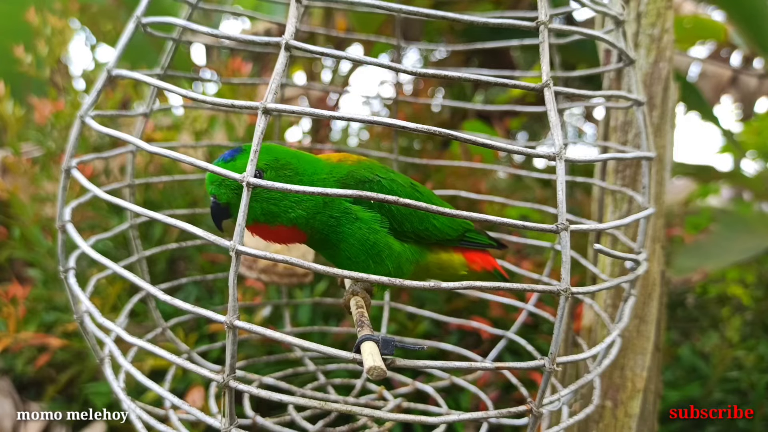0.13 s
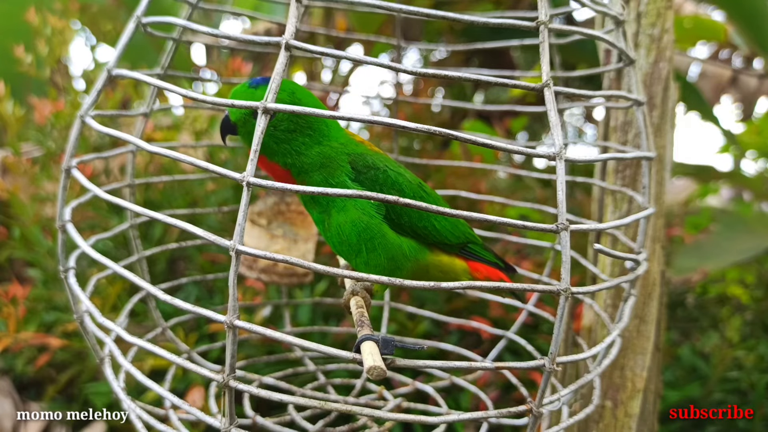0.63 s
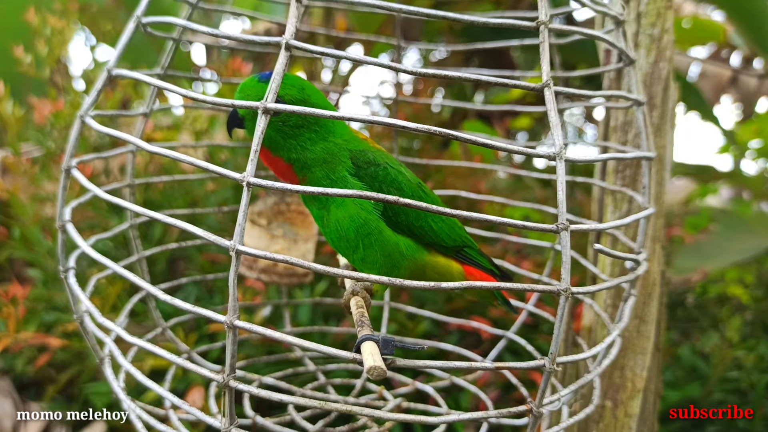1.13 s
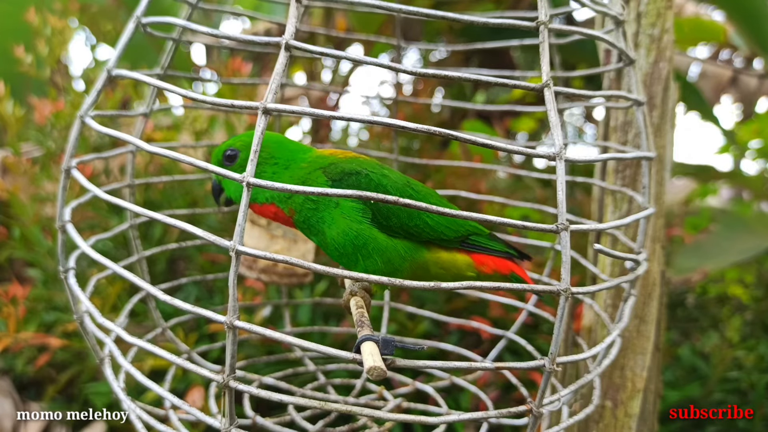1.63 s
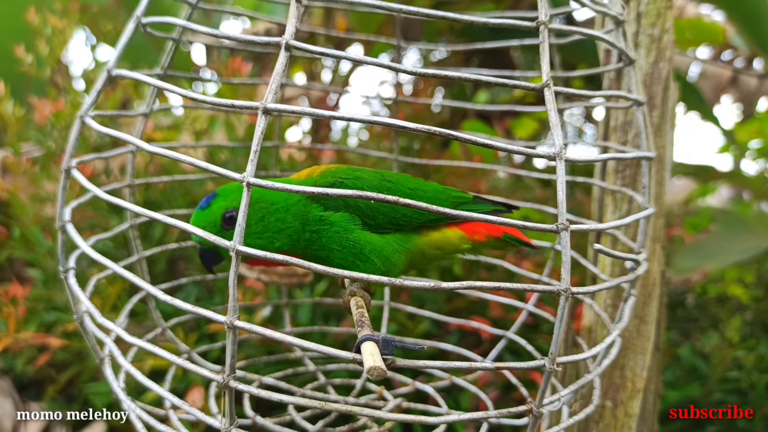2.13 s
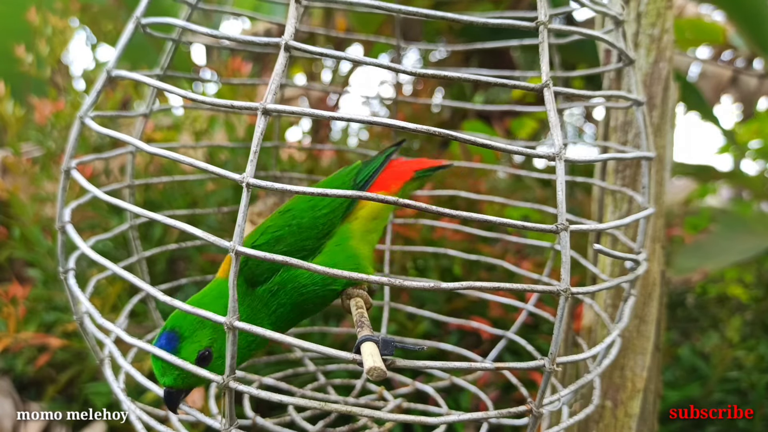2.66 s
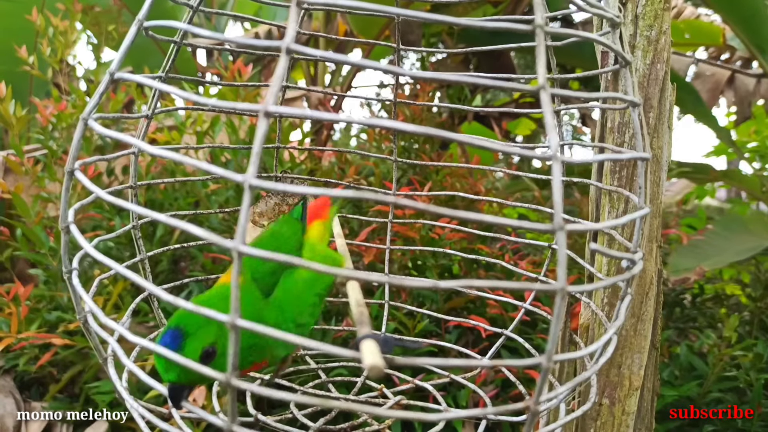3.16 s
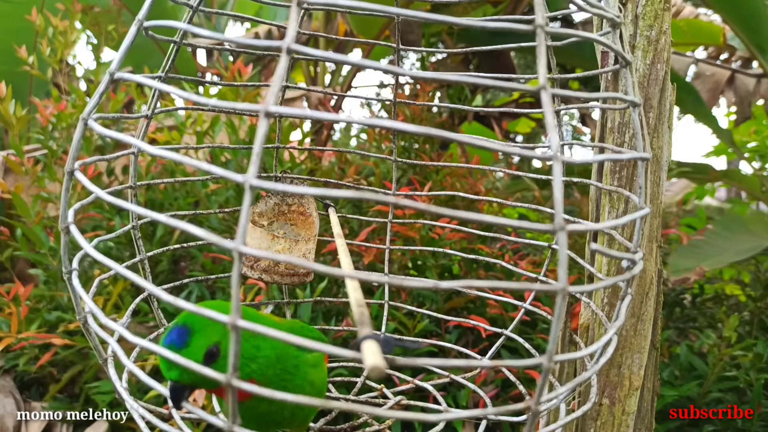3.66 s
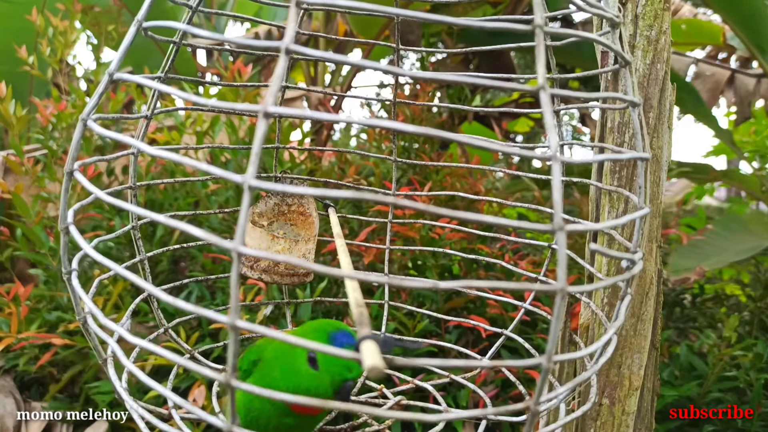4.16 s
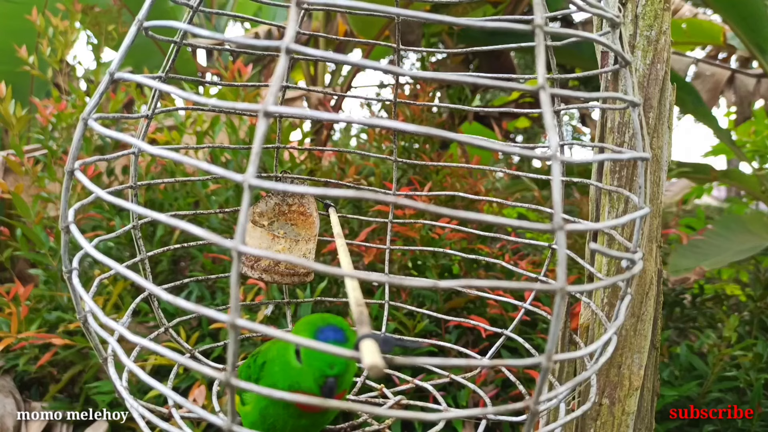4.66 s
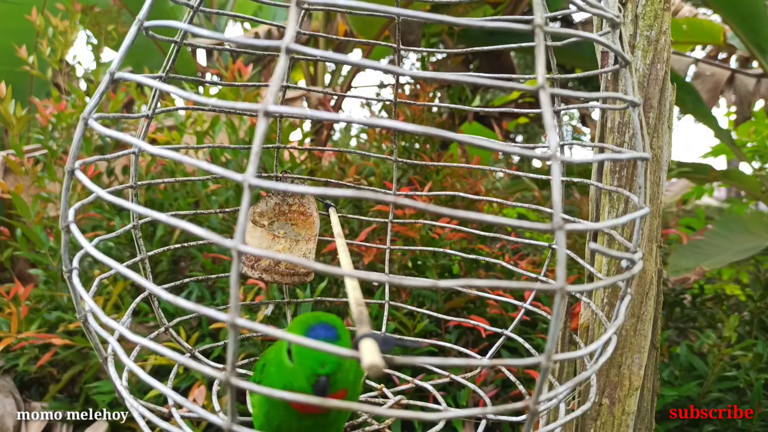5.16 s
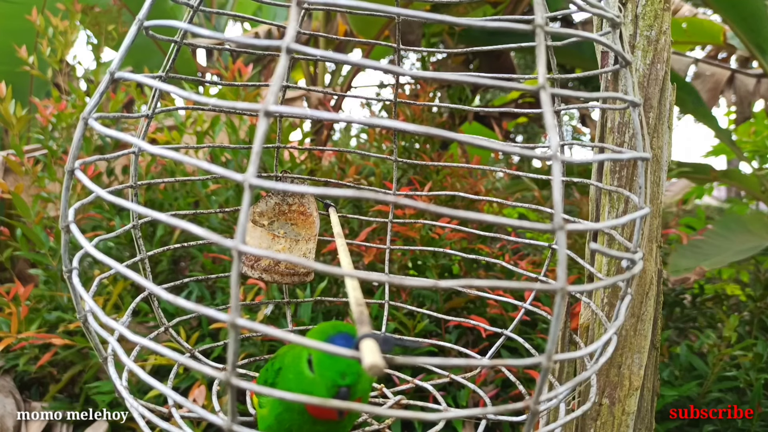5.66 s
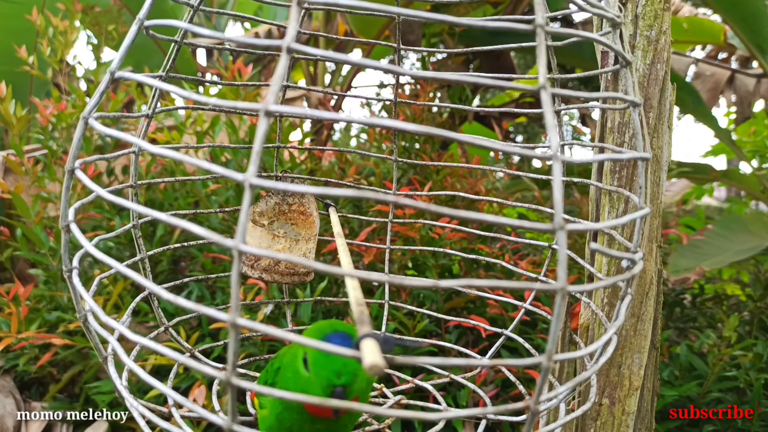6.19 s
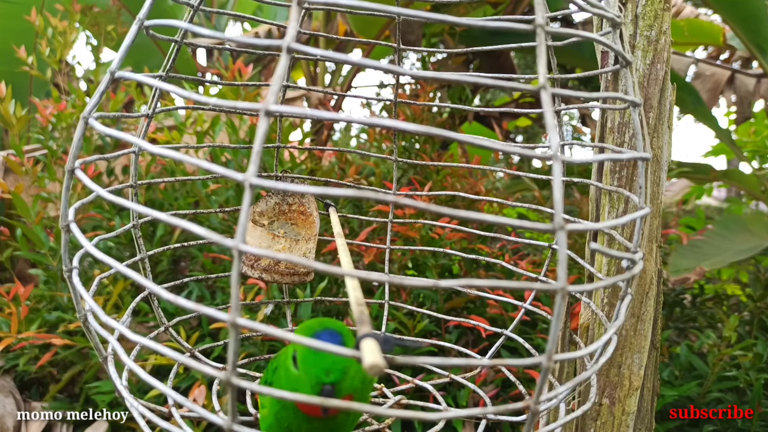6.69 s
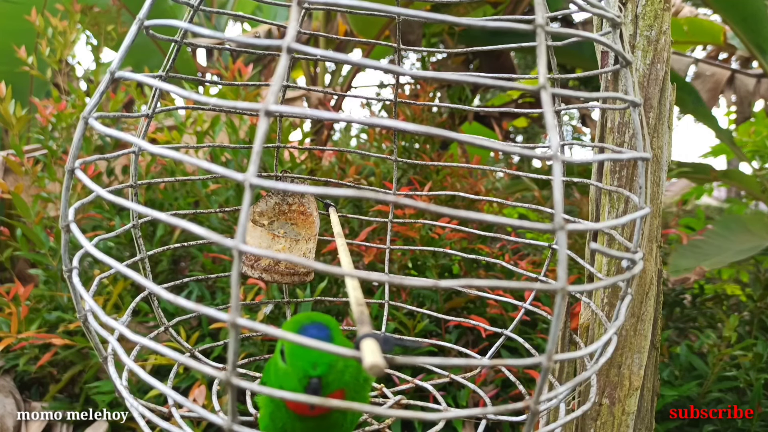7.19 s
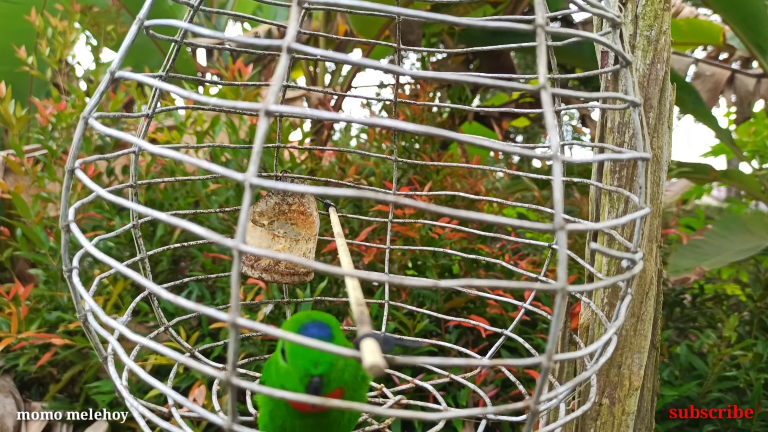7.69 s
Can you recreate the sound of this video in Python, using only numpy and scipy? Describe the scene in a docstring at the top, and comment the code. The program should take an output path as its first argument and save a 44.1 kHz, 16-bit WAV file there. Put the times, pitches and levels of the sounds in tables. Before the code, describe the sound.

A quiet garden heard by a phone microphone near a small parrot. Faint low traffic rumble, soft leaf hiss and a thin, flickering insect-like shrilling around 7 kHz run throughout. A far parrot trill fades at the start; others come as blurred echoes near 0.3, 1.4, 3.2 and 5.7 s. At 1.7-2.1 s the near parrot gives a piercing trill of about eight rapid whistled syllables, each breaking downward, ending in a lower slide. At 2.35-2.45 s comes a quick warbling chirp, rising then falling. A faint distant horn sounds at 2.5-2.8 s. Soft dove coos appear around 1.3-2.2 s and 4.2-6.1 s, with tiny far bird whistles clustering at 4.2-5.1 s. Slight rustles pass, one near 6.3 s. At 7.3-7.8 s the parrot trills again, louder, clearer and longer, with light garden echo.

```python
"""Caged parrot in a garden

A small parrot, close to a phone microphone, gives a shrill trill, a chirp and another trill: gliding
whistles with an octave, a rasp and a broad hiss that rises and falls with the calls. Far parrots trill
as echoes over a thin shrilling of noise. A dove's arching tones, small birds' glides and a far horn's
steady tones come with garden echo. Shaped noise makes traffic rumble, leaf hiss, rustles and insects."""
import sys
import numpy as np
from scipy import signal
from scipy.fft import rfft, irfft, next_fast_len
from scipy.io import wavfile
from scipy.ndimage import uniform_filter1d, map_coordinates

SR = 44100
rng = np.random.default_rng(int(sys.argv[2]) if len(sys.argv) > 2 else 0)


def dump(signal):
    """Clip the signal to [-1, 1] and save it as 16-bit WAV at the path in sys.argv[1]."""
    limited = np.clip(np.atleast_2d(signal).T, -1, 1)
    pcm = np.round(limited * 32767).astype(np.int16)
    wavfile.write(sys.argv[1], SR, pcm)


def level_to_linear(level):
    """Convert decibel levels to linear amplitude factors, elementwise."""
    exponent = np.asarray(level, float) / 20
    return 10 ** exponent


N = 344862
T = np.arange(N) / SR  # seconds


def unit(x):
    """Scaled to rms 1."""
    return x / np.sqrt(np.mean(x ** 2) + 1e-20)


def curves(rows):
    """One value per sample for each column after the time."""
    s, *columns = np.transpose(sorted(rows))
    return [np.interp(T, s, column) for column in columns]


def wobble(rate):
    """A smooth random curve, rate knots a second."""
    knots = rng.standard_normal(int(N * rate / SR) + 4)
    return map_coordinates(knots, [T * rate])


def noise():
    """White noise as long as the scene."""
    return rng.standard_normal(N)


def coloured(x, points):
    """x filtered through (Hz, dB) points read on a log frequency axis."""
    m = next_fast_len(N + 8192)
    hz, db = np.transpose(points)
    log_hz = np.log(np.fft.rfftfreq(m, 1 / SR) + 1)
    gain = level_to_linear(np.interp(log_hz, np.log(hz), db))
    return irfft(rfft(x, m) * gain, m)[:N]


def tone(hz):
    """Phase of a gliding pitch, in radians."""
    return 2 * np.pi * np.cumsum(hz) / SR


def narrow(hz, rate):
    """A narrow band of noise, rms 1: a tone in quadrature, each part moved by rate random knots a second."""
    phase = tone(hz + 0 * T)
    return unit(wobble(rate) * np.sin(phase) + wobble(rate) * np.cos(phase))


def echo(x, t60, delay):
    """A dense noise tail of unit energy, falling 60 dB in t60 s, silent until delay s."""
    t = np.arange(SR) / SR
    tail = rng.standard_normal(SR) * level_to_linear(-60 * t / t60) * (t > delay)
    return signal.fftconvolve(x, tail / np.linalg.norm(tail))[:N]


# the two near trills, levels ahead of the microphone port:
# opening_s, first_syllable_s, closing_note_s, pitch_hz, level_db, share of pitch lost by the close
NEAR_TRILLS = [(1.688, 1.72, 2.028, 6712, -19.5, .008), (7.3235, 7.353, 7.738, 6624, -12, .02)]
# how each trill opens and ends: opening accent_db, closing note length_s, tail length_s, tail_db
TRILL_ENDS = [(3, .028, 0.026, 3), (-9.5, .031, 0.018, -11)]
# syllables in each trill: total count, count of last ones that break deep
SYLLABLE_COUNTS = [(8, 2), (10, 3)]
# the near chirp, ahead of the microphone port: time_s, pitch_hz, level_db, warble_depth_hz
CHIRP_PATH = [(2.343, 6230, -61, 5), (2.349, 6040, -31.5, 0), (2.356, 6270, -34.5, 100),
              (2.360, 6630, -19, 552), (2.378, 7020, -26, 495), (2.390, 7360, -20, 102),
              (2.398, 7300, -25, -3.5), (2.416, 6680, -23, 4), (2.427, 6410, -20.5, 5),
              (2.443, 5937, -31, 1), (2.448, 6000, -60, 1.5)]
WARBLE_HZ, WARBLE_START_S = 185, 2.3612
# how the bird faces in each call: shadow_db at the held pitch, octave_db, half_pitch_db, call_hiss_db,
# rasp_db, near_echo_db, far_echo_db
BIRD_FACING = [(-15, -14, -34, -27, -29.5, -8.5, -18.5), (-6, -18, -60, -34.5, -30, -12.5, -28),
               (1, -15.5, -67.5, -34.5, -37, -13, -30)]
# colour of the broad hiss that follows the calls: frequency_hz, gain_db
CALL_HISS_COLOUR = [(2500, -20), (5000, -5.5), (6500, -1), (16000, -10.5)]
# the microphone port's response: frequency_hz, gain_db
MIC_PORT = [(2000, -11.5), (4000, -12), (5000, -21), (5800, -3), (6500, 0), (7500, 3), (8300, 1.5),
            (9000, -14.5), (11000, -19), (11800, 2), (13500, -8), (15000, -0.5), (15500, -40.5)]


def parrot():
    """Whistle, octave, half pitch, rasp and broad hiss of each call, with the echoes of cage and garden."""
    out = np.zeros(N)
    trills = zip(NEAR_TRILLS, TRILL_ENDS, SYLLABLE_COUNTS)
    first, last = (trill(row, ends, count) for row, ends, count in trills)
    for notes, facing in zip((first, CHIRP_PATH, last), BIRD_FACING):
        shadow_db, octave_db, half_db, call_hiss_db, rasp_db, near_db, far_db = facing
        hz, db, depth_hz = curves(notes)
        warble_hz = depth_hz * np.sin(2 * np.pi * WARBLE_HZ * (T - WARBLE_START_S))
        during = (T > notes[0][0]) * (T < notes[-1][0])
        # the warble is loud at its top and faint at its bottom
        level = level_to_linear(db + .011 * warble_hz + .4 * wobble(250)) * during
        phase = tone(hz + warble_hz + 25 * wobble(400))
        whistle = level * np.sqrt(2) * np.sin(phase)
        # turned away, a close reflection cancels the held pitch but not the glides
        held = np.exp(-((hz - 6710) / 130) ** 2)
        direct = whistle * level_to_linear(shadow_db * held)
        octave = level * level_to_linear(octave_db) * np.sqrt(2) * np.sin(2 * phase)
        half = level * level_to_linear(half_db + 7.2 * wobble(50)) * np.sin(phase / 2) * (hz > 6400)
        call_hiss = level_to_linear(call_hiss_db + 7.0 * wobble(240)) * unit(coloured(noise(), CALL_HISS_COLOUR))
        throat = level_to_linear(rasp_db) * rasp(notes[1][0] + 0.0012, hz)
        near = echo(whistle + level_to_linear(-1) * octave, t60=.12, delay=.003)
        far = echo(whistle + octave, t60=0.49, delay=0.033)
        far = coloured(far, [(4000, -12), (6000, -0.5)])
        out += direct + octave + half + level * (call_hiss + throat)
        out += level_to_linear(near_db) * near + level_to_linear(far_db) * far
    return coloured(out, MIC_PORT)


# the double flick before the first syllable: time_s from it, pitch factor, level_db
FLICK_PATH = [(-.019, 1, 0.5), (-.015, 1.05, -4.5), (-.012, 1.13, -2.5), (-.01, .99, -2),
              (-.008, .87, -8.5), (-.0055, 1.09, -2), (-.0035, .93, -7)]
# the closing note around its end: time_s from it, pitch factor, level_db
CLOSE_DROP = [(-.007, .99, -5), (0, 1.01, -1.5), (.003, .86, -13)]
# the low slide after the closing note: share of tail length, pitch factor, level_db
TAIL_SLIDE = [(0, 0.689, 2.5), (.35, .63, -6), (.75, 0.575, -4.5), (1, .58, -14), (1.15, 0.5, -39)]
# share by which the pace drags; closing pitch over that of the tired syllables
SLOWING, CLOSE_SHARE = .045, .98
HOLD_S, MEAN_SAG_DB = .0262, 3
# bottom of the first break, lowering per syllable, bottom of the deep breaks
SHALLOW_HZ, DEEPER_HZ, DEEP_HZ = 5593, 59, 4510


def trill(row, ends, count):
    """Opening note, flick, syllables that drag, tire and break deeper towards the end, closing note, tail."""
    opening, first, closing, hz, db, tire = row
    accent_db, close_s, tail_s, tail_db = ends
    total, deep = count
    rows = [(opening - .0025, 1.18 * hz, db - 46, 0),
            (opening + .001, 1.05 * hz, db + accent_db, 0),
            (opening + .004, hz, db - 3, 0)]
    rows += [(first + s, hz * k, db + d, 0) for s, k, d in FLICK_PATH]
    for i, (level_scatter, sag_scatter) in enumerate(rng.standard_normal((total, 2))):
        u = i / total
        start = first + (closing - first) * (u - SLOWING * u * (1 - u))
        bottom_hz = DEEP_HZ if total - i <= deep else SHALLOW_HZ - DEEPER_HZ * i
        rows += syllable(start, start + HOLD_S, hz * (1 - tire * u), bottom_hz,
                         db + .7 * level_scatter, MEAN_SAG_DB + 1.2 * sag_scatter)
    close_hz = hz * (1 - tire) * CLOSE_SHARE
    end = closing + close_s
    rows += [(closing + s, close_hz * k, db + d, 0) for s, k, d in ONSET_SHAPE]
    rows += [(end + s, close_hz * k, db + d, 0) for s, k, d in CLOSE_DROP]
    rows += [(end + 0.0067 + u * tail_s, close_hz * k, db + tail_db + d, 0) for u, k, d in TAIL_SLIDE]
    return sorted(rows)


# a syllable around its start, also the closing note's: time_s from it, pitch factor, level_db
ONSET_SHAPE = [(-.003, 1.16, -28), (-.0015, 1.09, -20), (0, 1.03, -9), (.002, 1.005, -1), (.005, 1, 0)]
# a syllable around its break: time_s from it, pitch factor, level_db
BREAK_SHAPE = [(-.005, 1.01, -.5), (-.001, 1.03, .5), (.001, 1.02, 0), (.0025, .96, -6)]


def syllable(start, stop, hz, bottom_hz, db, sag_db):
    """A held whistle whose level sags and lifts before its pitch breaks downward."""
    rows = [(start + s, hz * k, db + d, 0) for s, k, d in ONSET_SHAPE]
    rows += [(stop - .015, hz * .995, db - .8 * sag_db, 0), (stop - .008, hz, db - sag_db, 0)]
    rows += [(stop + s, hz * k, db + d, 0) for s, k, d in BREAK_SHAPE]
    bottom = stop + .0038 + 1.9e-6 * (hz - bottom_hz)  # deeper breaks last longer
    return rows + [(bottom, bottom_hz, db - 11, 0), (bottom + .0012, bottom_hz, db - 30, 0)]


# colour of the throat rasp: frequency_hz, gain_db
RASP_COLOUR = [(900, -25.5), (1700, -6.5), (2300, 0.5), (3000, -7.5), (5000, -0.5), (7000, -9.5),
               (16000, -25)]


def rasp(opening, hz):
    """Irregular 2 ms puffs of throat noise; strong ones as the call opens and before the pitch breaks."""
    puffs = (rng.random(N) < 150 / SR) * level_to_linear(3.5 * rng.standard_normal(N))  # about 150 a second
    breaks = np.flatnonzero(np.diff(1. * (hz < 6100)) > 0)
    puffs[breaks - round(.007 * SR)] = level_to_linear(6.5)
    puffs[round(opening * SR)] = level_to_linear(11.5)
    envelope = np.convolve(puffs, np.hanning(90), "same")
    return unit(coloured(envelope * noise(), RASP_COLOUR))


# far trills, each fading after its length: start_s, length_s, first_hz, last_hz, level_db
DISTANT_TRILLS = [(-.4, 0.38, 7000, 7000, -48.5), (.26, 0.11, 6710, 6490, -60.5),
                  (1.4, .45, 6920, 6790, -54), (3.2, 0.41, 6914, 6710, -50), (5.68, 0.5, 6800, 6800, -54)]
# thin shrilling: time_s, pitch_hz, level_db
SHRILL_PATH = [(0, 6950, -64.5), (.7, 6970, -80), (1.2, 6900, -66), (2.6, 6970, -73.5), (2.8, 7090, -65),
               (3.2, 7160, -64.5), (3.9, 6850, -80), (4.45, 6930, -72), (4.8, 6910, -76),
               (4.92, 7070, -66.5), (5.15, 7020, -73.5), (5.5, 7050, -68.5), (6.4, 7150, -64),
               (6.7, 7090, -70), (6.95, 7040, -76), (7.8, 7000, -71.5)]
# each far trill starts this far down, reaches full level, then dies away
SWELL_DB, SWELL_S, FADE_DB_PER_S = 4.5, .15, 109


def flock():
    """Far trills heard only as echoes, breaks blurred into a skirt below the pitch; thin noise shrilling."""
    path, level = [], 0
    for s, length, first_hz, last_hz, db in DISTANT_TRILLS:
        path += [(s, first_hz), (s + length, last_hz)]
        swell_db = SWELL_DB * np.clip(1 - (T - s) / SWELL_S, 0, 1)
        fade_db = FADE_DB_PER_S * np.clip(T - s - length, 0, None)
        level = level + (T > s) * level_to_linear(db - swell_db - fade_db)
    hz, = curves(path)
    pulse = np.sin(tone(26 + 3 * wobble(4.4)))
    breaks = np.clip(pulse - .75, 0, 1) * level_to_linear(2.3 * wobble(30))
    phase = tone(hz - 3000 * breaks + 110 * wobble(200))
    calls = level_to_linear(-80 * breaks) * (np.sin(phase) + level_to_linear(-34.5) * np.sin(2 * phase))
    blur = unit(echo(calls, t60=.3, delay=0))
    shrill_hz, shrill_db = curves(SHRILL_PATH)
    flicker_db = 2.1 * np.sin(tone(28 + 2.5 * wobble(2.7)))
    shrill = level_to_linear(shrill_db + flicker_db) * narrow(shrill_hz, 300)
    return uniform_filter1d(level, size=900) * blur + shrill


# coos, levels ahead of the echo mix: start_s, length_s, first_hz, reference pitch_hz, level_db
DOVE_COOS = [(1.328, 0.15, 650, 770, -58.5), (1.486, 0.17, 639, 749, -53.5), (2.049, .15, 658, 730, -51.5),
             (4.2, 0.11, 722, 742, -60.5), (4.5, 0.31, 561, 771.5, -55), (4.955, .24, 850, 804, -58),
             (5.149, .23, 730, 709, -53), (5.9, .19, 580, 740, -53)]
# a coo after its first pitch: share of length, factor on the reference pitch, level_db
COO_SHAPE = [(0.249, 0.96, -4), (.5, 0.99, -0.5), (.7, .93, -4.5), (1, .72, -10.5)]


def dove():
    """Soft rolling coos with strong echo: gliding tones, most arching up before they slide down."""
    out = np.zeros(N)
    for s, length, first_hz, pitch_hz, level_db in DOVE_COOS:
        path = [(s, first_hz, level_db - 10.5)]
        path += [(s + u * length, pitch_hz * k, level_db + d) for u, k, d in COO_SHAPE]
        hz, db = curves(path)
        during = (T > s) * (T < s + length)
        out += level_to_linear(db + 1.2 * wobble(40)) * np.sin(tone(hz + 40 * wobble(70))) * during
    return 0.9 * out + 0.82 * echo(out, t60=0.5, delay=.003)


# far whistles, levels ahead of the echo mix: start_s, length_s, first_hz, last_hz, level_db
FAR_WHISTLES = [(0.239, 0.087, 7200, 6000, -61.5), (1.048, 0.18, 3140, 3120, -82),
                (1.252, .093, 3407, 3280, -77), (1.29, 0.071, 6280, 6080, -69),
                (3.846, .3, 3330, 3100, -86), (4.17, 0.092, 5300, 5210, -71),
                (4.248, .081, 4900, 4150, -68.5), (4.39, 0.074, 1524, 1520, -74),
                (4.52, 0.071, 5160, 5030, -70.5), (4.575, 0.089, 5000, 4050, -66),
                (4.835, 0.038, 5940, 5800, -64), (4.85, .06, 5900, 5350, -65),
                (4.895, .073, 7200, 5900, -68), (5.055, 0.087, 6080, 5520, -71),
                (5.28, 0.087, 1178, 1160, -74.5), (5.516, 0.15, 1021, 979, -72),
                (7.201, .12, 1238, 1247, -72), (7.739, 0.07, 960, 950, -63.5)]
FLUTTER, GLIDE_FLUTTER = .014, 0.1  # pitch flutter as a share of the pitch and of the glide


def whistles():
    """Small far birds: gliding, fluttering notes, mostly echo from the garden."""
    out, flutter = np.zeros(N), wobble(120)
    for s, length, first_hz, last_hz, db in FAR_WHISTLES:
        glide_hz = last_hz - first_hz
        flutter_hz = FLUTTER * first_hz + GLIDE_FLUTTER * abs(glide_hz)
        at = slice(round(s * SR), min(N, round((s + length) * SR)))
        u = (T[at] - s) / length
        envelope = np.abs(np.sin(np.pi * u)) ** .5
        out[at] += level_to_linear(db) * envelope * np.sin(tone(first_hz + glide_hz * u + flutter_hz * flutter[at]))
    return 0.31 * out + 1.52 * echo(out, t60=0.73, delay=0.0026)


# the horn's steady tones: pitch_hz, relative level_db
HORN_TONES = [(1039, -88), (1389, -77), (1733, -77.5), (2073, -90)]


def horn():
    """A short far horn: steady tones that swell and stop together, with echo."""
    swell = np.interp(T, [2.5, 2.56, 2.76, 2.82], [0, 1, 1, 0])
    dry = swell * sum(level_to_linear(db + 5.5) * np.sin(2 * np.pi * hz * T) for hz, db in HORN_TONES)
    return 0.79 * dry + 0.51 * echo(dry, t60=0.41, delay=0.011)


# colour of the traffic rumble: frequency_hz, relative level_db per Hz
RUMBLE_COLOUR = [(15, -75), (25, -47), (38, -25.5), (82, -4.5), (146, -2), (224, -11.5), (824, -21),
                 (1010, -26), (1500, -31), (1950, -60.5), (3300, -120)]
# leaves and insects as the port colours them: frequency_hz, relative level_db per Hz
HISS_COLOUR = [(900, -42), (1500, 0.5), (3000, -4.5), (4700, -4), (5000, -12), (6000, -13), (6500, 2.5),
               (7600, 2.5), (8300, -5), (8700, -15.5), (11300, -24), (11800, -11.5), (15000, -8),
               (16000, -29.5)]
# brief rustles: centre_s, length_s, level_db
RUSTLE_BURSTS = [(1.282, 0.14, -74.5), (2.776, 0.0067, -63.5), (3.815, 0.018, -79), (4.4, .06, -77),
                 (6.332, 0.094, -66)]
# thin insect lines: pitch_hz, rate of random knots_per_s (sets the width), level_db
INSECT_LINES = [(7590, 110, -78.5), (8116, 120, -81.5)]


def garden():
    """Traffic rumble, leaf hiss with brief rustles, and thin insect lines, all of shaped noise."""
    rumble = level_to_linear(-60 + 0.83 * wobble(2.065)) * unit(coloured(noise(), RUMBLE_COLOUR))
    hiss = level_to_linear(-71.5 + 1.7 * wobble(3)) * unit(coloured(noise(), HISS_COLOUR))
    bursts = sum(level_to_linear(db) * np.exp(-((T - s) / length * 2) ** 2) for s, length, db in RUSTLE_BURSTS)
    rustle_colour = [(1200, -15), (2200, -1.0), (4500, -3), (6000, -4.5), (8300, 0.0), (9000, -23.5)]
    rustle = bursts * unit(coloured(noise(), rustle_colour))
    insects = sum(level_to_linear(db + 1.6 * wobble(2.5)) * narrow(hz, rate) for hz, rate, db in INSECT_LINES)
    return rumble + hiss + rustle + insects


def scene():
    """Everything at the one microphone."""
    mix = parrot() + flock() + dove() + whistles() + horn() + garden()
    return mix[None]  # one channel


def low_pass(x):
    """Removes everything above the highest recorded frequency."""
    return signal.sosfilt(signal.butter(12, 16290, fs=SR, output="sos"), x)


def record(dry):
    """The finished mix as the phone keeps it."""
    return low_pass(dry)


dry = scene()
out = record(dry)
dump(out)
```